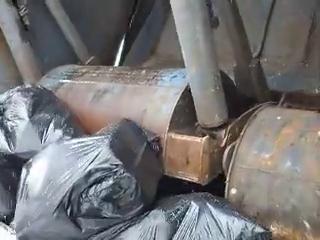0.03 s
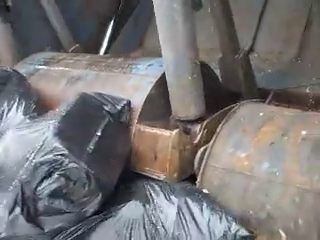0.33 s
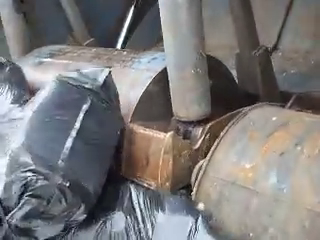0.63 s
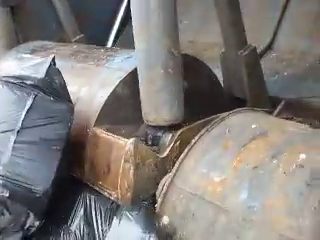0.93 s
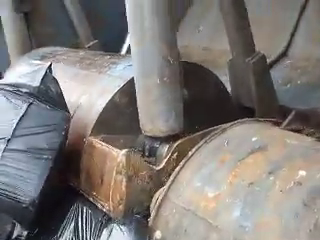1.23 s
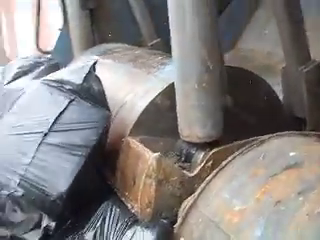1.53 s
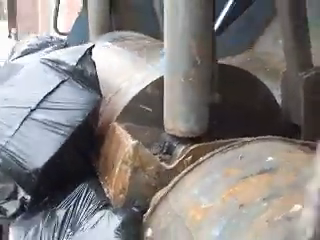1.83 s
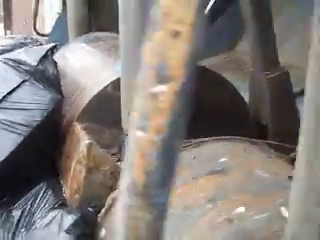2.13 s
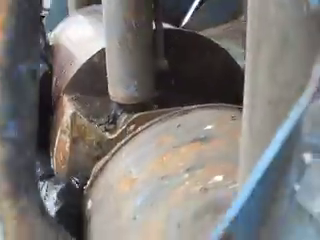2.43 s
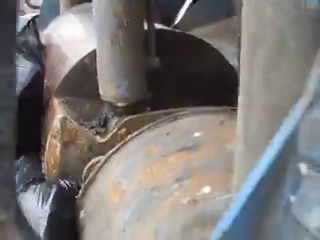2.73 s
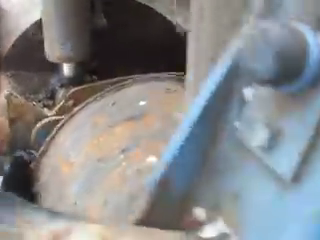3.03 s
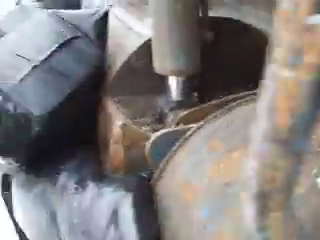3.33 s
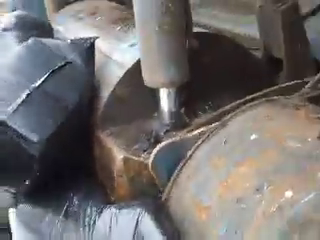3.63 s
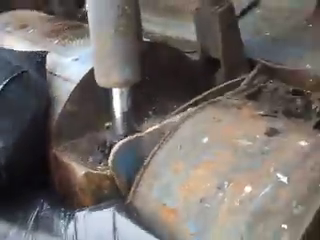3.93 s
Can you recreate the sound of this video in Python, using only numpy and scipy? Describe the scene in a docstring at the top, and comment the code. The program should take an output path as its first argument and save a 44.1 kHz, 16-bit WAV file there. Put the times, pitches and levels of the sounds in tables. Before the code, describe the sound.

A garbage truck packer crushes bin bags close by, over a steady engine roar. Plastic crinkles and tins clatter; the hydraulic hum sags in pitch midway, then recovers as rubbish thuds, grinds and cracks in the steel hopper.

```python
"""Garbage truck packer, close by.

Bin bags are pressed into a steel hopper. The engine throbs over a steady roar; the hydraulic hum
sags under load and recovers. Rubbish thuds, grinds and knocks on the steel, plastic crinkles and
snaps, tins clatter. The sharpest crack makes the gain control duck."""
import sys
import numpy as np
from scipy import signal
from scipy.fft import rfft, irfft
from scipy.io import wavfile

SR = 44100
rng = np.random.default_rng(int(sys.argv[2]) if len(sys.argv) > 2 else 0)


def wav_out(sig):
    """Save sig, one row per channel (or a flat mono array), as 16-bit PCM at SR to the path in sys.argv[1]."""
    wavfile.write(sys.argv[1], SR, np.round(np.clip(np.atleast_2d(sig).T, -1, 1) * 32767).astype(np.int16))


N = 176400
T = np.arange(N) / SR
HZ = np.fft.rfftfreq(N, 1 / SR)

# machine roar spectrum (frequency [Hz], relative density [dB])
ROAR_SPECTRUM = [(20, -7), (36, -11), (76, -8.5), (124, -5), (186, -12), (270, -7.5), (490, -10.5),
                 (750, -21.5), (1000, -16.5), (1350, -25.5), (1700, -23.5), (2500, -28.5), (4100, -29),
                 (5500, -37.5), (7000, -58)]
# engine partials (multiple of firing rate, relative level [dB])
ENGINE_PARTIALS = [(1, -1.5), (2, -10), (3, -18), (4, -27), (5, -18.5), (6, -21)]
# engine envelope (time [s], level [dB])
ENGINE_LEVEL_DB = [(0, -26.5), (.5, -27), (1.2, -24), (1.4, -46), (1.9, -38.5), (2.4, -37.5), (2.9, -28.5),
                   (3.13, -23.5), (3.28, -29.5), (4, -29)]
# hydraulic hum (time [s], pitch [Hz])
PUMP_PITCH_HZ = [(0, 181.1), (.5, 179.8), (.8, 180.5), (1.08, 174.2), (1.2, 184), (1.4, 161), (1.62, 135.5),
                 (1.75, 126.2), (1.87, 120.5), (2.0, 121.7), (2.25, 124.2), (2.5, 128.2), (2.75, 135.2),
                 (2.95, 158.5), (3.06, 181.4), (3.17, 187.1), (3.5, 182.8), (4, 180.6)]
# hum partials 1-4 (time [s], relative level of each [dB])
PUMP_LOW_DB = [(0, -20.5, -30, -29, -38), (.3, -22, -34, -34.5, -37), (.6, -18, -25, -38, -44),
               (.8, -24, -22, -48, -41), (1, -27.5, -28.5, -39.5, -38), (1.12, -25, -51, -40, -56),
               (1.3, -26, -32.5, -31.5, -49), (1.52, -21, -32.5, -42.5, -40.5),
               (1.75, -29, -19.5, -33.5, -36.5), (1.87, -28, -29, -31, -44),
               (1.97, -21.5, -24.5, -27.5, -47), (2.1, -27, -27.5, -26, -33), (2.22, -37.5, -24, -41, -29),
               (2.42, -22, -23.5, -29.5, -33.5), (2.6, -24.5, -47, -32.5, -56),
               (2.76, -53, -37, -39.5, -49.5), (2.95, -42, -29, -42, -41), (3.12, -18.5, -30.5, -37.5, -44),
               (3.33, -24, -25, -34, -43.5), (3.65, -20.5, -22, -39, -37), (4, -21.5, -19.5, -32, -43.5)]
# upper hum partials (multiple, relative level [dB])
PUMP_HIGH_DB = [(5, -45.5), (6, -51), (7, -51), (8, -66.5), (9, -59), (11, -59), (13, -55.5)]
# hum flutter as the load shifts (time [s], rms depth [dB])
PUMP_FLUTTER_DB = [(0, 1.5), (.8, 1.5), (1.1, 1.5), (1.6, 2.3), (1.95, 1.0), (2.35, 1.8), (2.6, 2),
                   (3.1, 1.5), (3.6, 1.4)]
# whistles, perhaps oil in the valves (start [s], length [s], level [dB], start [Hz], end [Hz])
VALVE_WHISTLES = [(1.481, .18, -44.5, 1965, 1846), (1.85, 0.7, -49.5, 4250, 4271)]
# tumbling rubbish envelope (time [s], level [dB])
THUD_DB = [(0, -30), (.8, -30.5), (.86, -18.5), (.97, -21), (1.08, -27), (1.28, -22), (1.45, -30.5),
           (1.9, -38), (2.33, -45), (2.46, -20), (2.6, -18.5), (2.76, -30.5), (2.86, -20.5), (2.97, -17.5),
           (3.14, -27.5), (3.3, -28.5), (3.65, -38.5), (4, -43)]
# its spectrum (frequency [Hz], relative density [dB])
THUD_SPECTRUM = [(20, -9), (40, -4.5), (75, -8.5), (130, -2), (240, -2), (330, -9), (450, -15),
                 (700, -21.5), (1500, -55)]
# grinding envelope (time [s], level [dB])
GRIND_LEVEL_DB = [(0, -32), (.22, -28), (.45, -36.5), (.8, -27.5), (.86, -35.5), (.97, -22.5), (1.08, -24),
                  (1.28, -32), (1.5, -42.5), (1.8, -44.5), (2.33, -45), (2.39, -30.5), (2.5, -29.5),
                  (2.6, -28.5), (2.72, -37.5), (2.803, -36), (2.822, -19), (2.98, -32.5), (3.07, -27.5),
                  (3.14, -24), (3.25, -36.5), (3.65, -36), (4, -38)]
# its spectrum (frequency [Hz], relative density [dB])
GRIND_SPECTRUM = [(150, -26.5), (350, 0), (480, 0), (700, 6), (850, -2.5), (1050, -10), (1400, -11),
                  (2200, -27), (5000, -43)]
# steel plate modes (frequency [Hz], width [Hz], lift [dB])
PLATE_MODES = [(470, 10, 2.4), (607, 67, 4.5), (798, 13, 1.4), (796, 40, 4.5)]
# crinkling plastic envelope (time [s], level [dB])
CRINKLE_LEVEL_DB = [(0, -33), (.19, -29), (.42, -32.5), (.62, -30.5), (.85, -31), (.99, -42.5), (1.24, -32),
                    (1.38, -59.5), (1.85, -56), (2.33, -41.5), (2.48, -34), (2.7, -36), (2.83, -39),
                    (2.92, -29), (3.0, -35), (3.14, -28), (3.27, -33), (3.58, -30.5), (3.7, -34), (4, -31)]
# its spectrum (frequency [Hz], relative density [dB])
CRINKLE_SPECTRUM = [(400, 4), (900, -2.5), (1300, 1.5), (1650, -3), (2300, 3.5), (3200, 2), (4300, 2.5),
                    (5000, -2.5), (6000, -5)]
# modes of two hard objects, perhaps tins (frequency [Hz], relative level [dB], T60 [s])
TIN_A_MODES = [(1484, 2, 0.071), (1870, -7, .1), (2120, -10, .12), (2160, 5, 0.084), (2320, -10.5, 0.35),
               (2575, -3.5, 0.28), (2880, 0, .12), (3300, -1.5, .08), (3150, -8.5, 0.22),
               (3800, -16.5, 0.064), (3900, 3, .08)]
TIN_B_MODES = [(1486, 5.5, 0.048), (2110, 8.5, .035), (2573, -1, 0.17), (2789, -16, .14), (3280, -3, .15),
               (3440, -15, 0.17), (3540, -6, 0.13), (3717, -1.5, .24), (4016, -3.5, 0.22)]
# tin strikes (time [s], level [dB], decay [s], tin)
TIN_STRIKES = [(.3835, -37, 0.027, "a"), (0.696, -19.5, .04, "a"), (1.0346, -25, 0.11, "b"),
               (2.464, -28, .06, "a")]
# hard rubbish on the hopper (time [s], relative level [dB], centre [Hz], decay [s])
HOPPER_KNOCKS = [(.1035, -6, 610, 0.0032), (.207, -9.5, 750, 0.0067), (.358, 1.5, 760, 0.0023),
                 (.484, -17.5, 800, .005), (.839, -14, 620, 0.0068), (.848, -10, 260, 0.013),
                 (.88, -4, 200, 0.0055), (.917, -8.5, 496, .013), (2.469, -2, 470.6, 0.013),
                 (2.566, -15, 620, 0.0081), (2.65, -18, 700, 0.0061), (2.8105, 0.5, 660.2, 0.0037),
                 (2.956, -3, 400, 0.0092), (3.082, -7, 250, 0.011), (3.047, -14, 650, 0.0092),
                 (3.383, -13.5, 1000, 0.0051), (3.4172, -3, 800, .002), (3.649, -17.5, 900, 0.0062),
                 (3.974, -19.5, 650, 0.01)]
# plastic snaps (time [s], relative level [dB], centre [Hz], decay [s])
PLASTIC_SNAPS = [(.2049, -4.5, 2600, 0.0025), (.2095, -15, 3000, 0.0018), (.256, -15, 4500, 0.0019),
                 (.3032, -8.5, 2800, 0.0031), (.3605, -6.5, 2010, 0.0035), (.3838, -2.5, 2300, 0.0013),
                 (.4514, -7.5, 3900, 0.0017), (.4843, -1.5, 3300, 0.0023), (.615, -14.5, 3800, 0.0074),
                 (.784, -4, 2600, 0.00099), (.7968, -11.5, 3900, 0.0019), (.9165, -15, 2600, 0.006),
                 (1.0345, -10.5, 3500, 0.0045), (1.045, -6, 1900, .005), (1.756, -23, 4000, 0.0032),
                 (1.9969, -9, 3500, 0.002), (2.4745, -5.5, 4000, 0.0017), (2.7072, -14.5, 4300, 0.0068),
                 (2.7818, -2.5, 3700, .0025), (2.7895, -5, 3600, 0.0018), (3.1148, -17, 4700, 0.0069),
                 (3.3139, -12.5, 4400, .003), (3.3955, -7, 2800, 0.0024), (3.411, -12.5, 3700, 0.0023),
                 (3.4172, 5, 3800, 0.0014), (3.5079, -12.5, 2500, .004), (3.5643, -15, 2600, 0.0032),
                 (3.5818, -9, 2600, 0.0038), (3.595, -7, 4200, 0.0028), (3.6301, -5, 2150, 0.0027),
                 (3.649, -10.5, 2900, 0.0044), (3.7835, -12, 4100, .0015), (3.817, -20.5, 3900, .0015),
                 (3.8741, -9.5, 4600, 0.0037), (3.992, -10.5, 3500, 0.0035)]


def amp(db):
    """dB to gain."""
    return 10 ** (np.asarray(db) / 20)


def unit(x):
    """Scale to rms 1."""
    return x / np.sqrt(np.mean(x ** 2) + 1e-20)


def curve(rows, column=1):
    """Time table column, interpolated per sample."""
    rows = np.array(rows)
    return np.interp(T, rows[:, 0], rows[:, column])


def add(mix, start_s, sound):
    """Mix in at start_s."""
    part = mix[round(start_s * SR):][:len(sound)]
    part += sound[:len(part)]


def colour(x, spectrum, modes=()):
    """Minimum-phase filter with optional resonances; output rms 1."""
    hz, db = np.transpose(spectrum)
    modes_db = sum(lift / (1 + (2 * (HZ - centre) / width) ** 2) for centre, width, lift in modes)
    log_gain = np.log(amp(np.interp(np.log(HZ + 1), np.log(hz), db) + modes_db))
    cepstrum = 2 * irfft(log_gain, N) * (np.arange(N) < N // 2)
    cepstrum[0] /= 2
    return unit(irfft(rfft(x) * np.exp(rfft(cepstrum)), N))


def wander(rate_hz):
    """Low-passed noise, rms 1."""
    return unit(irfft(rfft(rng.standard_normal(N)) * np.exp(-(HZ / rate_hz) ** 2), N))


def clicks(per_s, spread_db):
    """Random clicks, mostly small, rms 1."""
    size = amp(spread_db * np.minimum(rng.exponential(1, N), 4.5))
    return unit(size * rng.choice([-1, 1], N) * (rng.random(N) < per_s / SR))


def band(centre_hz, octaves, size=SR // 2):
    """Band noise, rms 1."""
    hz = np.fft.rfftfreq(size, 1 / SR)
    shape = 1 / (1 + (np.log2((hz + 1) / centre_hz) / octaves) ** 6) ** .5
    return unit(irfft(rfft(rng.standard_normal(size)) * shape, size))


def harmonics(phase, partials, flutter_db, flutter_hz):
    """Partials of one pitch, each fluttering independently."""
    out = np.zeros(N)
    for multiple, db in partials:
        gain = amp(db + flutter_db * wander(flutter_hz))
        out += gain * np.sqrt(2) * np.cos(multiple * phase + 2 * np.pi * rng.random())
    return out


def bursts(rows, octaves, rise_s):
    """Band noise bursts: fast rise, exponential decay."""
    out, t = np.zeros(N), T[:SR // 2]
    for start_s, db, centre_hz, decay_s in rows:
        fall = np.exp(-t / decay_s)
        rise = 1 - np.exp(-(t / rise_s) ** 2)
        burst = band(centre_hz, octaves) * fall * rise
        add(out, start_s, amp(db) * burst * np.linalg.norm(fall) / np.linalg.norm(burst))
    return out


def roar(level_db=-32.5):
    """Steady noise of the running machine."""
    return amp(level_db) * colour(rng.standard_normal(N), ROAR_SPECTRUM)


def engine(firing_hz=53.38, jitter=.025):
    """Low throb: harmonics of the firing rate."""
    phase = 2 * np.pi * firing_hz * np.cumsum(1 + jitter * wander(rate_hz=11)) / SR
    throb = harmonics(phase, ENGINE_PARTIALS, flutter_db=1.7, flutter_hz=17)
    return amp(curve(ENGINE_LEVEL_DB)) * throb


def pump(gain_db=-.5, jitter=.004):
    """Hydraulic hum; pitch sags under load, then recovers."""
    pitch_hz = curve(PUMP_PITCH_HZ) * (1 + jitter * wander(rate_hz=25))
    phase = 2 * np.pi * np.cumsum(pitch_hz) / SR
    partials = [(k, curve(PUMP_LOW_DB, column=k)) for k in range(1, 5)] + PUMP_HIGH_DB
    return amp(gain_db) * harmonics(phase, partials, curve(PUMP_FLUTTER_DB), flutter_hz=24)


def valves(width_hz=190):
    """Narrow hiss, swelling and fading as the hydraulics strain."""
    out = np.zeros(N)
    for start_s, length_s, db, start_hz, end_hz in VALVE_WHISTLES:
        progress = np.clip((T - start_s) / length_s, 0, 1)
        phase = 2 * np.pi * np.cumsum(start_hz + (end_hz - start_hz) * progress) / SR
        hiss = wander(width_hz / 2) * np.cos(phase) + wander(width_hz / 2) * np.sin(phase)
        out += amp(db) * np.sqrt(abs(np.sin(np.pi * progress))) * hiss
    return out


def thuds():
    """Dull impacts of rubbish tumbling against the hopper."""
    return amp(curve(THUD_DB)) * colour(clicks(per_s=500, spread_db=2.5), THUD_SPECTRUM)


def grinding():
    """Stick-slip of rubbish excites the steel plate."""
    slips = clicks(per_s=1800, spread_db=1.5) * amp(3 * wander(rate_hz=14))
    return amp(curve(GRIND_LEVEL_DB)) * colour(slips, GRIND_SPECTRUM, PLATE_MODES)


def crinkle():
    """Tiny plastic creases, each ringing a few cycles, over ticks and a soft rustle."""
    creases, t = np.zeros(N), T[:512]
    for hz in np.geomspace(900, 5600, 18):
        crease = unit(np.sin(2 * np.pi * hz * t) * np.exp(-t * hz / 2.5)) * np.sqrt(hz)
        creases += signal.oaconvolve(clicks(per_s=110, spread_db=3.5), crease)[:N]
    sheet = unit(creases) + .78 * clicks(per_s=140, spread_db=2) + rng.standard_normal(N)
    sheet *= amp(.6 * wander(rate_hz=100))
    return amp(curve(CRINKLE_LEVEL_DB)) * colour(sheet, CRINKLE_SPECTRUM)


def clatters(rattle_per_s=450, rattle_db=-7, rasp_db=-.5):
    """Struck tins ring, then rattle and rasp to rest."""
    out, t = np.zeros(N), T[:SR // 2]
    for start_s, db, decay_s, tin in TIN_STRIKES:
        fall = np.exp(-t / decay_s)
        taps = amp(rattle_db) * fall * rng.standard_normal(len(t))
        taps *= rng.random(len(t)) < rattle_per_s / SR
        taps[0] = 1  # first strike
        ring = sum(amp(mode_db - 60 * t / t60_s) * np.sin(2 * np.pi * (hz * t + rng.random()))
                   for hz, mode_db, t60_s in {"a": TIN_A_MODES, "b": TIN_B_MODES}[tin])
        rattle = signal.fftconvolve(taps, ring)[:len(t)]
        rattle *= np.linalg.norm(fall) / np.linalg.norm(rattle)
        rasp = fall * band(centre_hz=2550, octaves=.55)
        add(out, start_s, amp(db) * (rattle + amp(rasp_db) * rasp))
    return out


def knocks(gain_db=-6.5):
    """Hard rubbish strikes the hopper."""
    return amp(gain_db) * bursts(HOPPER_KNOCKS, octaves=.68, rise_s=.0024)


def snaps(gain_db=-7.5):
    """Crushed plastic gives way in sharp cracks."""
    return amp(gain_db) * bursts(PLASTIC_SNAPS, octaves=.63, rise_s=.00039)


def hopper(x, t60_s=.25, wet_db=-11.5):
    """Direct sound plus short reflections off the steel walls."""
    t = T[:SR // 2]
    echoes = rng.standard_normal(len(t)) * (rng.random(len(t)) < .06)
    tail = echoes * (t > .003) * amp(-60 * t / t60_s)
    return x + amp(wet_db) * signal.fftconvolve(x, tail / np.linalg.norm(tail))[:N]


def scene():
    """Machine plus crushed rubbish, mono."""
    crushing = crinkle() + clatters() + snaps() + knocks()
    machine = pump() + engine() + roar() + valves()
    return (machine + thuds() + grinding() + hopper(crushing))[None]


def record(dry, mic_hz=5650, threshold_db=-4, release_db_per_s=75, clip_db=-2.5, cutoff_hz=15800):
    """Microphone low-pass, gain ducking after peaks, clipping, final low-pass."""
    mic_fir = signal.firwin(161, mic_hz, window=("kaiser", 7), fs=SR)
    x = signal.fftconvolve(dry[0], mic_fir, "same")
    over_db = np.maximum(20 * np.log10(abs(x) + 1e-9) - threshold_db, 0)
    duck_db = np.maximum.accumulate(over_db + release_db_per_s * T) - release_db_per_s * T
    duck_db = signal.lfilter(np.ones(64) / 64, 1, duck_db)  # 1.5 ms attack
    x = np.clip(x * amp(-duck_db), -amp(clip_db), amp(clip_db))
    output_fir = signal.firwin(511, cutoff_hz, window=("kaiser", 9), fs=SR)
    return signal.fftconvolve(x, output_fir, "same")[None]


dry = scene()
out = record(dry)
wav_out(out)
```